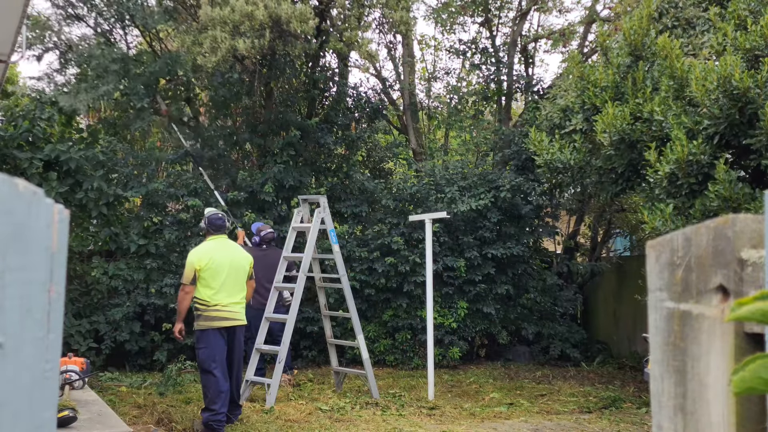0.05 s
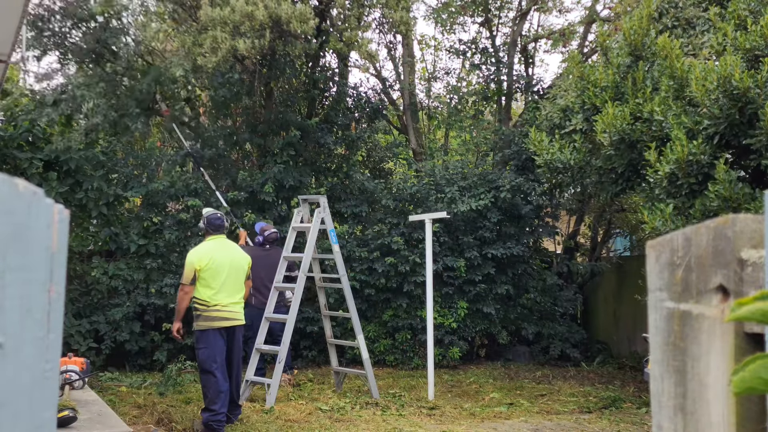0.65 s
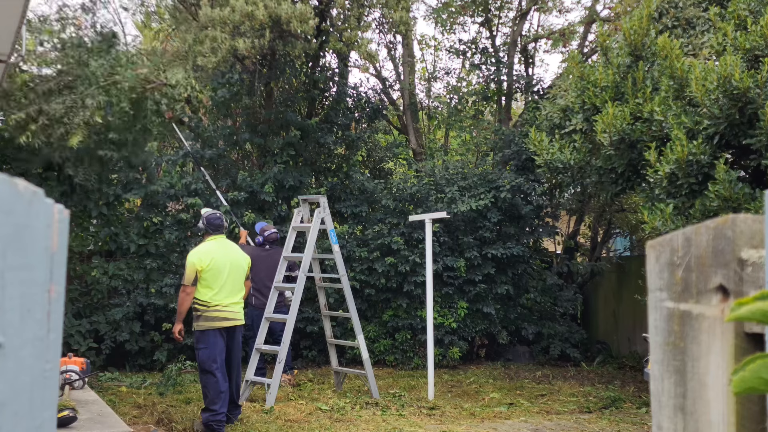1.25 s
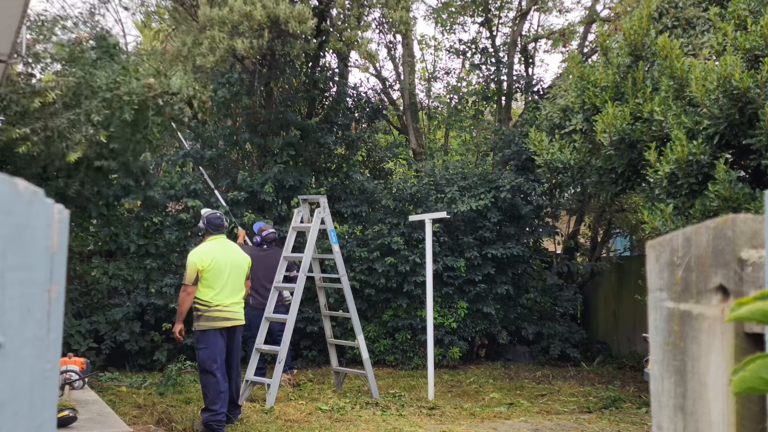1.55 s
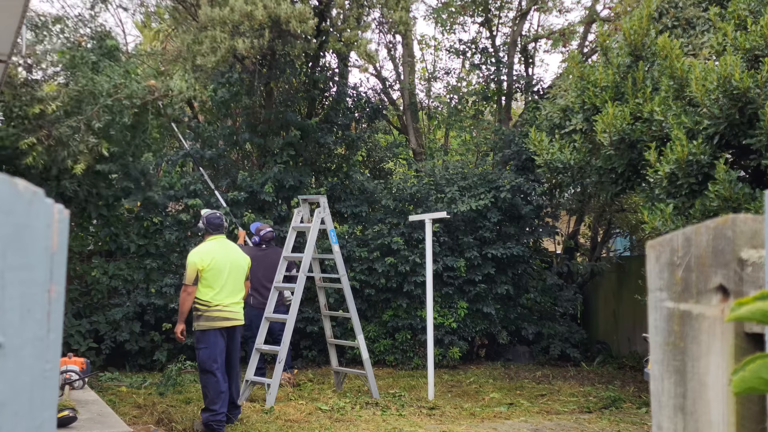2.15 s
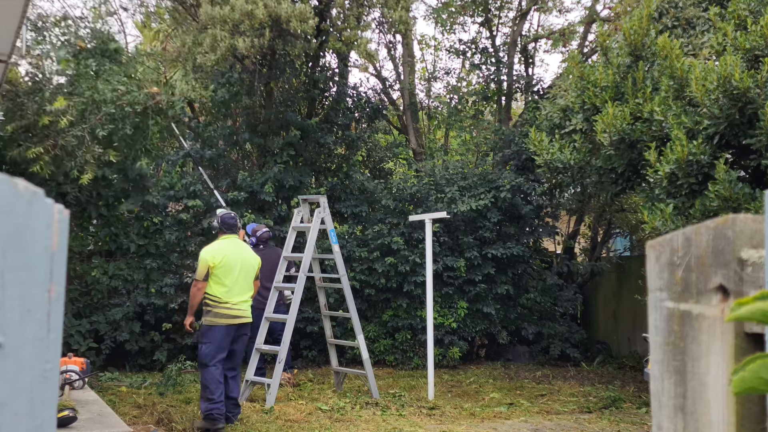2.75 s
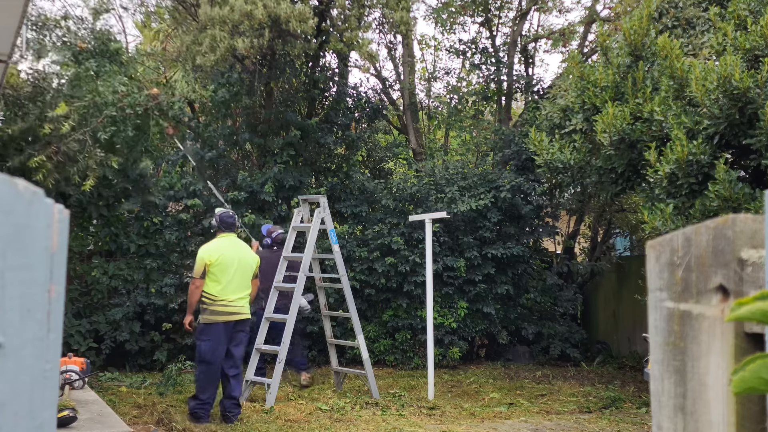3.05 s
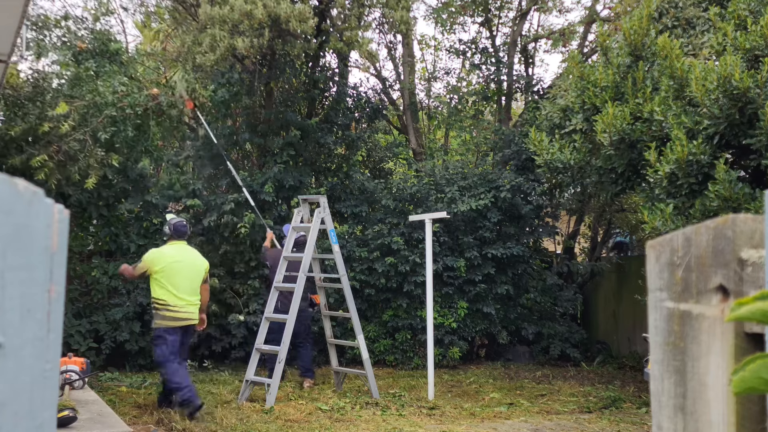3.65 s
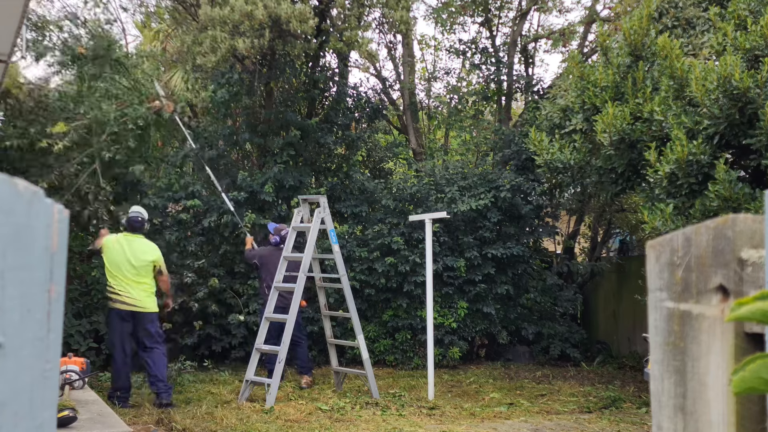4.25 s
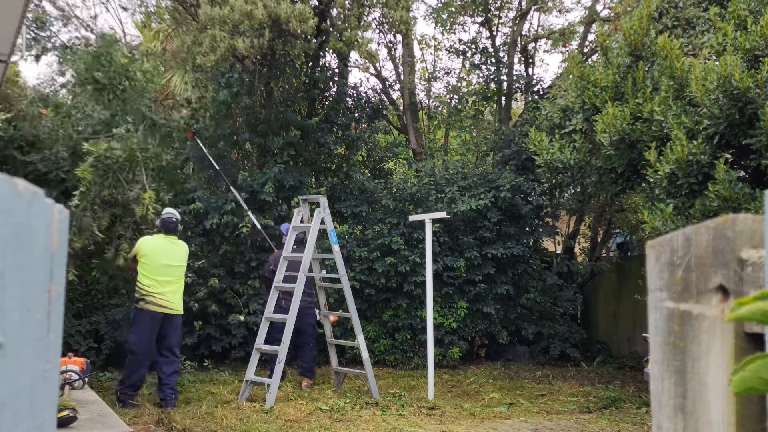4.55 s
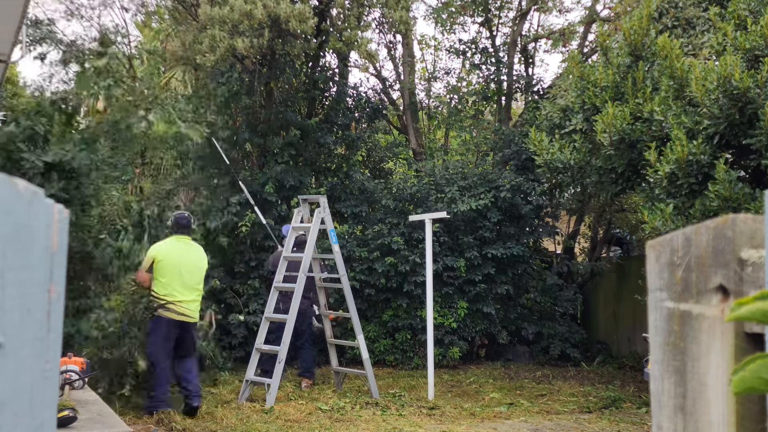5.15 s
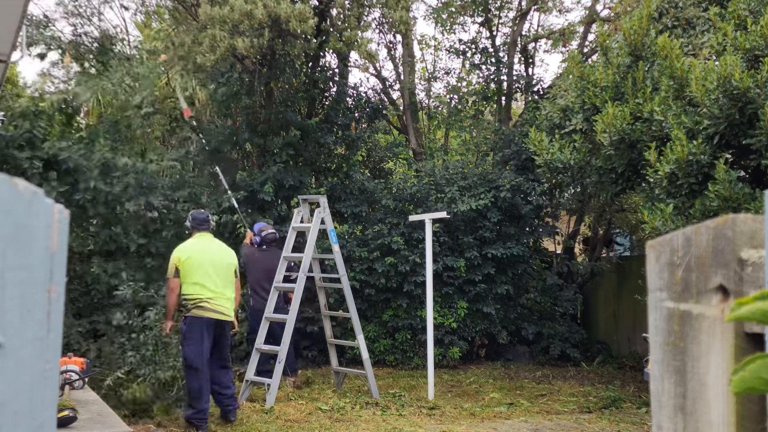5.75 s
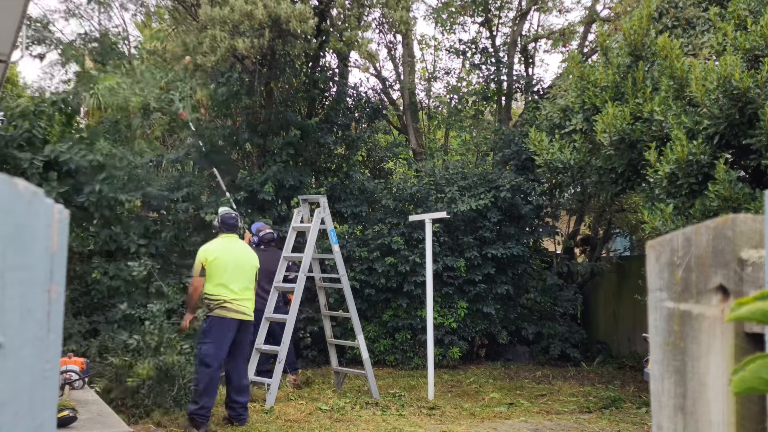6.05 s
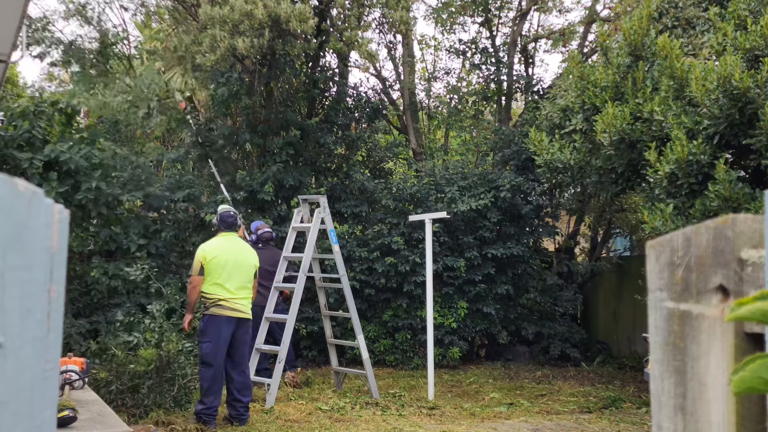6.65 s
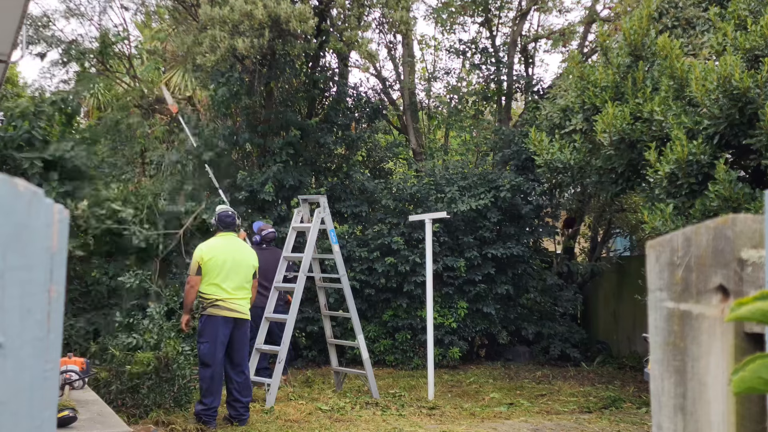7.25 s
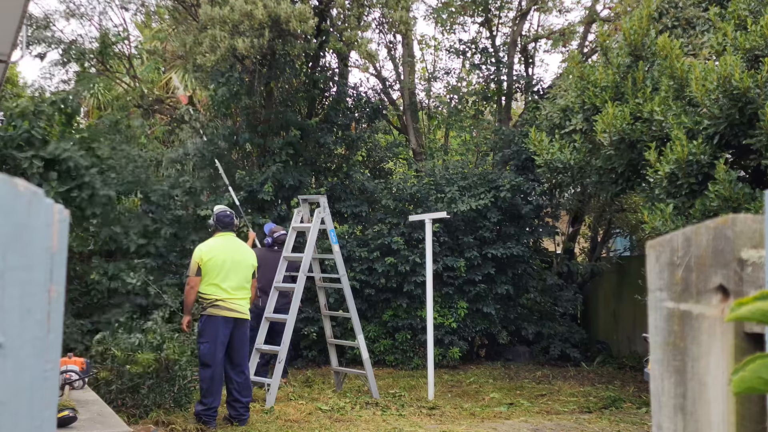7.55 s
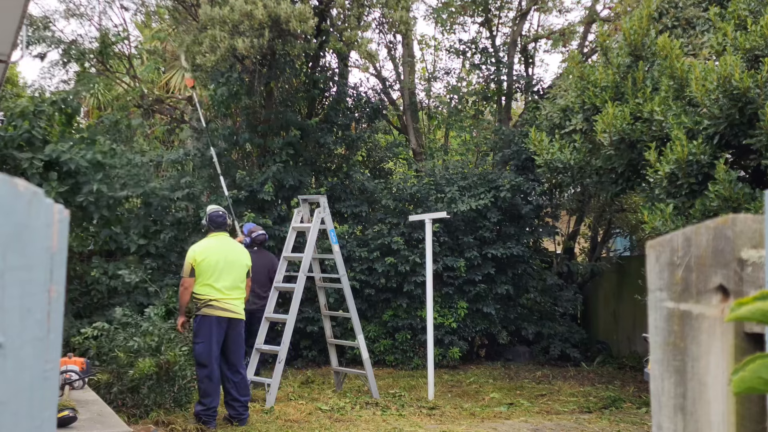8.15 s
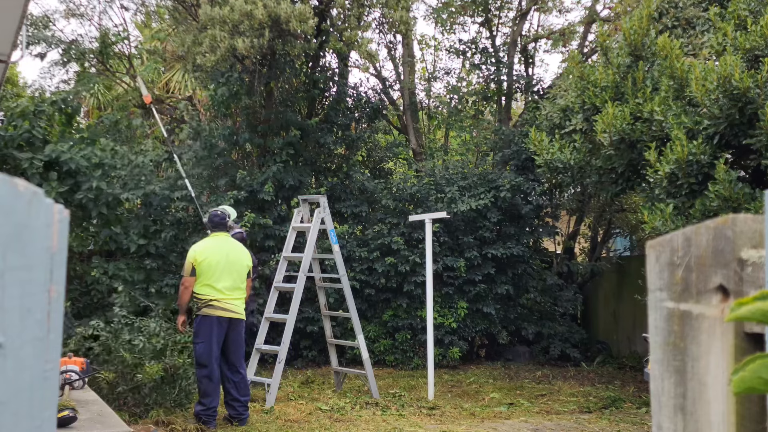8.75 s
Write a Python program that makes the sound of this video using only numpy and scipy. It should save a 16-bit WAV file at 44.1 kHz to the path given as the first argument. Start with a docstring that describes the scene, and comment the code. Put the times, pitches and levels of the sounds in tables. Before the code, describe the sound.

A petrol pole saw is already running flat out, some metres away in a quiet backyard and slightly to the left. Its exhaust booms and snarls under the rasp and thin metallic ring of the chain. The pitch sags as the chain bites at about 0.6 and 1.6 seconds, recovering each time. At 2.9 seconds the throttle shuts and the engine coasts down to a lumpy idle, with uneven pops, clinks and sharp little knocks. Around 5 seconds a cut branch brushes softly through leaves. At 5.7 seconds the engine chugs up again and holds full speed from 6 to 7 seconds. It then winds down and idles with the same ragged popping and clatter until the end at about 9 seconds, with a tiny leaf rustle near 8.6 seconds. A faint outdoor hush lies underneath throughout.

```python
"""Pole saw in a hedged backyard

A four-stroke petrol pole saw, some metres off, runs flat out twice, sagging when the chain bites,
and drops to a lumpy, knocking idle after each run. Exhaust pulses boom, bark and snarl through the
muffler, chain and gears rasp and ring the bar, and a cut branch brushes through the leaves.
Hedge and fence scatter the sound over a faint outdoor hush."""
import sys
import numpy as np
from scipy import signal
from scipy.fft import rfft, irfft, next_fast_len
from scipy.io import wavfile
from scipy.ndimage import uniform_filter1d

SR = 44100
rng = np.random.default_rng(int(sys.argv[2]) if len(sys.argv) > 2 else 0)


def master_out(mix):
    """Clip the mix to full scale and print it as 16-bit PCM to the path in sys.argv[1]."""
    frames = np.transpose(np.atleast_2d(mix))
    ceiling = np.clip(frames, -1, 1)
    pcm = np.round(ceiling * 32767).astype(np.int16)
    wavfile.write(sys.argv[1], SR, pcm)


N = 397341
T = np.arange(N) / SR
FULL_HZ, IDLE_HZ = 80.3, 23.476  # firing rates

# squeezes of the throttle:
# (opens [s], flat out [s], shuts [s], boom [dB], bark [dB], snarl [dB], snarl drift [dB/s])
BURSTS = [(-.3, -.03, 2.896, -49.5, -69.5, -65.5, 0.5), (5.69, 5.973, 7.019, -47.5, -69, -57, -11)]
# heavy exhaust pops that stand out of the idle: (time [s], peak [dB])
HEAVY_POPS = [(3.207, -58), (3.255, -56), (3.364, -51), (3.388, -51), (3.410, -53), (3.481, -54),
              (3.533, -51.5), (3.648, -55), (3.699, -52.5), (3.770, -57), (3.833, -58), (3.889, -57),
              (3.93, -57), (4.045, -55), (4.093, -60), (4.151, -63), (4.247, -60), (4.300, -55),
              (4.357, -55.5), (4.435, -54), (4.489, -62), (4.58, -55), (4.62, -55), (4.705, -60),
              (4.877, -59), (5.101, -60), (5.216, -54), (5.309, -58), (5.444, -56.5), (5.600, -61),
              (7.365, -61), (7.44, -52), (7.484, -55), (7.563, -55), (7.627, -51), (7.695, -58),
              (7.816, -60), (7.904, -54), (8.085, -58), (8.286, -55), (8.473, -56), (8.623, -59),
              (8.693, -58), (8.825, -57)]
# strength of the other idle strokes, one curve for each spell of idling: (time [s], peak [dB])
IDLE_SPELLS = [
    [(3.17, -69), (3.33, -59), (3.43, -54.5), (3.59, -62), (3.72, -60), (4.42, -59.5), (5.02, -63),
     (5.2, -61), (5.72, -56)],
    [(7.28, -80), (7.38, -60.5), (7.87, -56), (8.35, -59), (8.75, -58), (9.0, -59.5)],
]
# muffler resonances heard at low speed: (frequency [Hz], width [Hz], level [dB])
MUFFLER_MODES = [(74, 30, 2.5), (155, 26, -2), (185, 130, -3)]


def firing_rate(pick_up_hz_per_s=280, coast_s=.175):
    """The engine climbs steadily from idle, sags where the chain bites and coasts back down."""
    # engine speed through each cut: (time [s], firing rate [Hz])
    first_cut = [(0.0, 76.65), (0.23, 76.34), (0.44, 72.86), (0.6, 68.1), (0.69, 70.07), (0.8, 76.3),
                 (1.16, 77), (1.32, 77.2), (1.6, 69.2), (1.66, 69.88), (1.77, 71.3), (2.19, 75.22),
                 (2.32, 73.04), (2.42, 76.46), (2.86, 77.22), (2.91, 76.27)]
    second_cut = [(5.96, 71.13), (6.023, 76.65), (6.211, 76.7), (6.45, 79.06), (6.518, 77.47),
                  (6.644, 78.72), (6.8, 76.42), (7.035, 77)]
    hz = np.full(N, IDLE_HZ)
    for cut in (first_cut, second_cut):
        s, cut_hz = np.transpose(cut)
        above_idle = np.interp(T, s, cut_hz) - IDLE_HZ - pick_up_hz_per_s * np.maximum(s[0] - T, 0)
        coasting = np.exp(-np.maximum(T - s[-1], 0) / coast_s)
        hz = np.maximum(hz, IDLE_HZ + above_idle * coasting)
    return hz


def crank(hz):
    """Crankshaft turns, two to a firing; the idle hunts, and every heavy pop falls on a whole turn."""
    hunting = 1 + .00239 * walk(25) + .02 * walk(20) * (hz < 35)
    turns = np.cumsum(2 * hz * hunting) / SR
    pop_s = np.array(HEAVY_POPS)[:, 0]
    slip = np.unwrap(np.interp(pop_s, T, turns) % 1, period=1)
    return turns - np.interp(T, pop_s, slip)


def boom(turns, hz):
    """The muffler booms at shaft and firing rate; both tones slide along its resonances."""
    # flanks of the muffler resonances: (frequency [Hz], gain [dB])
    flanks = [(68, -12), (72, -5.5), (77, -3.5), (136, -2.5), (140, -7.5), (146, -2.5), (152, 1.5),
              (157, 2.7)]
    shaft = undb(curve(2 * hz, flanks)) * np.cos(2 * np.pi * turns)
    firing = undb(curve(hz, flanks)) * np.sin(np.pi * turns + np.pi / 4)
    gain = sum(undb(db) * envelope(start, end, .055, .026) for _, start, end, db, *_ in BURSTS)
    return np.sqrt(2) * (shaft + firing) * gain


def bark(turns, hz, honk_width_hz=38, smear_rad=.547):
    """Stereo overtones of the uneven exhaust pulses; each wavers as its paths round the yard shift."""
    # exhaust tone above the boom, shaped by the muffler: (frequency [Hz], level [dB])
    exhaust_eq = [(205, 8), (218, 9), (228, 5.5), (275, 0), (308, 5), (342, -1.5), (362, 8.5), (385, 4),
                  (410, -6.5), (440, 4), (485, 5.5), (510, -2.5), (540, -2.5), (590, -9.5), (680, 0),
                  (830, -3), (1020, 0), (1220, -4.5), (1310, .5), (1600, -5.5), (1820, -5), (2400, -10)]
    # bands that honk or drop out with the way the outlet faces:
    # (start [s], end [s], centre [Hz], gain [dB])
    honks = [(0, 1.402, 975, 7), (.85, 1.3, 1280, 4.5), (1.5, 1.85, 866, -2), (1.5, 1.898, 986, 8),
             (1.754, 2.099, 710, 4.5), (1.853, 2.1, 810, 6.5), (2.4, 2.901, 770, 4.5), (2.4, 2.9, 1140, 3),
             (2.19, 2.686, 1062, 10), (2.7, 2.9, 1500, 5), (5.95, 6.451, 713, 11.5), (5.95, 6.3, 910, 8.5),
             (5.95, 6.349, 1005, 9), (5.95, 6.195, 1340, 11), (6.35, 6.65, 1190, 9.5),
             (6.45, 7.051, 846, 11.5), (6.55, 7.05, 612, 10.5), (6.706, 7.051, 303.2, 5.5),
             (6.45, 7.05, 954, -14), (.8, 1.3, 870.4, -17), (1.354, 1.753, 732, 5), (1.7, 2.1, 1220, 6),
             (6.0, 6.7, 1545, 7)]
    gain = sum(undb(db) * envelope(start, end, .064, .073) for _, start, end, _, db, *_ in BURSTS)
    on = gain > gain.max() / 1000
    firing_phase = np.pi * turns + .008 * walk(110)
    gain = gain * undb(.9 * walk(90))
    bands = [(at_hz, db * gate(start, end, fade_s=.039)[on]) for start, end, at_hz, db in honks]
    stereo = np.zeros((2, N))
    for k in range(3, 32):
        tone_hz = k * hz[on]
        low_hz, high_hz = tone_hz.min() - 2 * honk_width_hz, tone_hz.max() + 2 * honk_width_hz
        honk_db = sum(db * np.exp(-((tone_hz - at_hz) / honk_width_hz) ** 2)
                      for at_hz, db in bands if low_hz < at_hz < high_hz)
        astray = np.clip((k * FULL_HZ - 200) / 700, 0, 1)  # lows come straight, highs by many paths
        waver_db = astray * (1.8 * walk(7)[on] + 1.2 * walk(25)[on])
        level = undb(curve(tone_hz, exhaust_eq) + honk_db + waver_db)
        lag = smear_rad * (min(k, 9) - 3) ** 2  # the muffler staggers low tones, rounding the pulse
        phase = k * firing_phase[on] - lag + (.3 + .6 * astray) * walk(2)[on]
        side = .48 * astray * np.cos(phase + 2 * walk(1.43)[on])
        stereo[:, on] += level * (np.cos(phase) + np.array([side, -side]))
    return np.sqrt(2) * stereo * gain


def snarl(turns, hz, sag_db_per_hz=-.7):
    """Rough gas tears out with each firing, weaker as the chain drags the speed down."""
    # throaty midrange of the gas: (frequency [Hz], level [dB])
    gas_eq = [(350, -25.5), (600, 2), (800, 4), (1020, 7.5), (1200, -3), (1400, -3), (1900, -14),
              (3000, -18), (6000, -27)]
    firings = strokes(turns, weak_db=-14, scatter_db=2, jitter_s=.0002)
    gas = colour(unit(hiss() * tail(firings, decay_s=.003)), gas_eq)
    gain = 0
    for _, start, end, _, _, db, drift in BURSTS:
        held_s = np.clip(T, start, end)
        sag_db = sag_db_per_hz * (FULL_HZ - np.interp(held_s, T, hz))
        gain += undb(db + drift * (held_s - start) + sag_db) * envelope(start, end, .15, .024)
    return gas * gain


def spit(turns, trim_db=-6.5):
    """Gas spits from the outlet with every firing, scaled to each burst's snarl setting."""
    # low body and bright edge of the spit: (frequency [Hz], level [dB])
    spit_eq = [(500, 9), (1400, -18), (3000, -14), (6500, 4), (9500, -6.5), (15000, -7)]
    puffs = hiss() * tail(strokes(turns, weak_db=-9, scatter_db=2.5, jitter_s=.0001), decay_s=.006)
    gain = sum(undb(snarl_db + trim_db) * envelope(opens + .093, shuts, .086, .091)
               for opens, _, shuts, _, _, snarl_db, _ in BURSTS)
    return colour(unit(puffs), spit_eq) * gain


def chain(turns, hz, rasp_db=-54, ring_db=-59, grip_s=.25):
    """While the clutch grips, links and gears rasp; the bar rings more freely at full speed."""
    # broad rasp of chain and gears: (frequency [Hz], level [dB])
    rasp_eq = [(30, -8.5), (200, -2), (600, -7), (1100, -1.8), (1500, -.5), (2400, -1.3), (2900, -.5),
               (3500, -2.7), (4400, -4.5), (6300, -5.7), (7600, -4.2), (9200, -15.2), (12000, -15.7),
               (15500, -16.2)]
    surge = 1 + .023 * np.cos(np.pi * turns - 1) + .0062 * np.cos(2 * np.pi * turns - 1)
    grains = unit(hiss() * surge * undb(1.25 * walk(440) + .88 * walk(30) + .69 * walk(6)))
    rasp = undb(rasp_db) * colour(grains, rasp_eq)
    damping_db = .57 * np.clip(FULL_HZ - hz, 0, 10)
    ringing = undb(ring_db - damping_db) * metal(hiss() * surge)
    clutch = sum(envelope(opens + grip_s, shuts, grip_s, .13) for opens, _, shuts, *_ in BURSTS)
    return (rasp + ringing) * clutch


def metal(x):
    """The metal parts ring; which one speaks changes as the chain shifts on the bar."""
    # modes of guide bar, clutch drum and pole: (frequency [Hz], base width [Hz], level [dB])
    modes = [(2665, 50, -1), (2926, 40, 5.5), (4160, 130, 1), (4340, 90, 1), (4720, 220, -3),
             (5340, 160, -4.5), (7410, 85, -1)]
    return unit(sum(undb(db + 2.5 * walk(22) + 2 * walk(3)) * ring(ring(x, hz, 1.5 * width), hz, 4 * width)
                    for hz, width, db in modes))


def gulps(turns, level_db=-54.5):
    """As the throttle opens, the first full charges thud in the muffler's lowest resonance."""
    hz, width, _ = MUFFLER_MODES[0]
    firings = strokes(turns, weak_db=-15, scatter_db=4, jitter_s=.00082)
    thuds = ring(ring(firings, hz, width), hz, width)
    gain = sum(envelope(opens + .15, opens + .16, .15, .032) for opens, *_ in BURSTS)
    return undb(level_db) * even_out(thuds, SR // 7) * gain


def sputter(turns, level_db=-54):
    """Picking up and running down, the engine chugs raggedly into the muffler."""
    puffs = muffler(strokes(turns, weak_db=-3, scatter_db=1.5, jitter_s=.0009))
    gain = 0
    for opens, start, shuts, *_ in BURSTS:
        above_idle = envelope(start, shuts + .12, start - opens, .086)
        flat_out = envelope(start, shuts, .043, .099)
        gain += above_idle * (1 - flat_out)
    return undb(level_db) * even_out(puffs, SR // 16) * gain


def strokes(turns, weak_db, scatter_db, jitter_s, count=1100):
    """A pulse a turn, strong exhaust then weak intake, each a little off in size and time."""
    index = np.arange(count)
    size, lag = rng.standard_normal((count, 2)).T
    sizes = undb(weak_db * (index % 2) + scatter_db * size) * (index > turns[0]) * (index < turns[-1])
    return pulses(np.interp(index, turns, T) + jitter_s * lag, sizes)


def muffler(beats, top_hz=265):
    """Each pulse leaves the muffler as a round pop that peaks at the pulse's time and height."""
    kick = signal.unit_impulse(SR // 8)
    modes = sum(undb(db) * ring(kick, hz, width) for hz, width, db in MUFFLER_MODES)
    pop = signal.sosfilt(signal.butter(4, top_hz, fs=SR, output="sos"), modes)
    pop = ring(pop, hz=150, width_hz=240)  # the chamber softens the onset
    height = np.abs(signal.hilbert(pop))
    return signal.oaconvolve(beats, -pop / height.max())[height.argmax():][:N]


def idle(turns, lead_s=.002, loose_db=-77, clink_db=-4):
    """Uneven pops leave the muffler; valves and slack chain clatter with each, in step with its force."""
    # clatter of valves and chain: (frequency [Hz], level [dB])
    clatter_eq = [(200, -25.5), (400, 2.5), (700, 3.5), (1100, -4), (1450, 2), (2000, -2), (2700, -3),
                  (3400, -5), (4700, -8.5), (6200, -4.5), (7500, -6.5), (9200, -16.5), (15000, -23.5)]
    # clatter against the strokes, one value a spell: (level [dB])
    clatter_levels = [-13.5, -14.5]
    s, size = idle_strokes(turns)
    beats, shaking = 0, 0
    for spell, clatter_db in zip(IDLE_SPELLS, clatter_levels):
        start, end = spell[0][0], min(spell[-1][0], T[-1])
        sizes = size * (s > start) * (s < end)
        beats += pulses(s, sizes)
        ticks = uniform_filter1d(tail(pulses(s - lead_s, sizes), decay_s=.011), SR // 250)
        loose = undb(loose_db) * envelope(start, end, .1, .05)
        shaking += undb(clatter_db) * (ticks + loose)
    rattle = colour(hiss(), clatter_eq) + undb(clink_db) * clinks(s - 2 * lead_s)
    return muffler(beats) + rattle * shaking


def idle_strokes(turns, scatter_db=1.2, count=1100):
    """Time and strength of each idle turn: exhaust and intake alternate from the last heavy pop."""
    # intake against exhaust strokes, fading as the idle settles: (time [s], level [dB])
    intake = [(4.45, 2.5), (4.7, -5.5), (5.3, -3), (5.45, 1), (7.88, 0), (8.0, -4.5), (8.55, -10),
              (8.7, -18)]
    index = np.arange(count)
    s = np.interp(index, turns, T)
    pop_s, pop_db = np.transpose(HEAVY_POPS)
    pop_turn = np.round(np.interp(pop_s, T, turns)).astype(int)
    last_pop = pop_turn[np.maximum(np.searchsorted(pop_turn, index, "right") - 1, 0)]
    is_intake = (index - last_pop) % 2
    db = curve(s, np.vstack(IDLE_SPELLS)) + is_intake * curve(s, intake)
    db += scatter_db * rng.standard_normal(count)
    db[pop_turn] = pop_db
    return s, undb(db)


def clinks(stroke_s, centre_hz=4100, width_hz=600, scatter_oct=.3, scatter_db=3):
    """Another link of the slack chain rings at every stroke, with its own pitch and strength."""
    links = np.clip(rng.standard_normal((len(stroke_s) + 1, 2)), -2, 2)
    pitch, size = links[np.searchsorted(stroke_s, T)].T
    shimmer = unit(signal.sosfilt(signal.butter(2, width_hz / 2, fs=SR, output="sos"), hiss()))
    tone = np.sqrt(2) * np.cos(2 * np.pi * np.cumsum(centre_hz * 2 ** (scatter_oct * pitch)) / SR)
    return shimmer * tone * undb(scatter_db * size)


def knocks(crack_trim_db=1, ring_decay_s=.019):
    """A hard idle stroke cracks in the housing and rings the pole briefly."""
    # strokes that knock the drive shaft: (time [s], crack [dB], ring [dB], ring pitch [Hz])
    hits = [(3.2048, -69, -64, 4420), (3.243, -74, -70, 4210), (3.362, -67, -62, 3950),
            (3.3867, -66, -68, 3620), (3.408, -62, -65, 3650), (3.430, -64, -68, 5000),
            (3.478, -69, -59, 4930), (3.533, -69, -67, 4930), (3.6463, -67, -70, 4560),
            (3.6726, -68, -62, 4670), (3.697, -66, -54.5, 4780), (3.828, -65, -70, 4130),
            (3.887, -71, -60, 4400), (3.9291, -73, -65.5, 4350), (3.963, -65, -56.5, 4075),
            (4.082, -66, -62, 4260), (4.2459, -72, -64, 4390), (4.2992, -71, -63, 4640),
            (4.383, -66, -56, 5660), (4.4223, -65, -66, 4540), (4.5736, -68, -64, 4430),
            (5.216, -62, -59, 4650), (5.4888, -68, -58, 4640), (5.5983, -63, -62, 4680),
            (5.6386, -74, -58, 4680), (7.4393, -65, -69, 4500), (7.626, -70, -64, 5170),
            (7.9445, -69, -61, 4960), (8.08, -68, -63, 5200), (8.415, -68, -65, 5500),
            (8.82, -69, -66, 4570)]
    # crack of the housing: (frequency [Hz], level [dB])
    crack_eq = [(200, -15), (600, 7), (1300, -9), (2600, 3), (3400, -7), (4800, -4), (6200, -8), (7500, -2),
                (9200, -18), (15000, -23)]
    s, crack_db, _, _ = np.transpose(hits)
    snaps = tail(pulses(s, undb(crack_db + crack_trim_db)), decay_s=.007)
    out = colour(hiss() * uniform_filter1d(snaps, SR // 400), crack_eq)
    t = T[:SR // 10]
    for start, _, db, hz in hits:
        tone = ring(rng.standard_normal((3, len(t))) * np.exp(-t / ring_decay_s), hz, width_hz=260)
        i = int(start * SR)
        out[:, i:i + len(t)] += (undb(db) * tone / np.abs(tone).max())[:, :N - i]
    return out


def hum(hz=150.6):
    """A soft wavering tone carries on between the idle strokes."""
    # swell of the hum: (time [s], level [dB])
    levels = [(3.2, -74), (4.2, -70.5), (4.9, -76.5), (5.3, -74), (5.6, -65), (7.3, -69), (8.15, -67.5),
              (8.6, -73.5), (9.0, -68)]
    tone = np.sqrt(2) * np.sin(2 * np.pi * np.cumsum(hz + 4 * walk(9)) / SR)
    idling = sum(envelope(spell[0][0] + .1, spell[-1][0], .1, .05) for spell in IDLE_SPELLS)
    return tone * idling * swell(levels)


def foliage():
    """Leaves and twigs brush past each other in countless small ticks."""
    # foliage dragged through the hedge: (start [s], end [s], attack [s], level [dB])
    drags = [(4.815, 5.21, 0.38, -66.5), (8.59, 8.613, 0.039, -76)]
    # rustle of the leaves: (frequency [Hz], level [dB])
    rustle_eq = [(200, 11.5), (500, -3.5), (1500, -5.5), (3000, -3.5), (7500, -1), (9200, -11),
                 (15500, -14.5)]
    grains = hiss() * undb(3 * np.minimum(rng.exponential(size=N), 3.5) + 1.2 * walk(70))
    gain = sum(undb(db) * envelope(start, end, attack, .52 * attack) for start, end, attack, db in drags)
    return colour(unit(grains), rustle_eq) * gain


def ambience(hush_db=-72.5):
    """Faint outdoor hush with a narrow whirr in it."""
    # bed of the yard: (frequency [Hz], level [dB])
    hush_eq = [(25, -9), (70, 13.5), (160, -5), (330, -1.5), (600, -7.5), (1000, -4.5), (1800, -12),
               (3500, -10.5), (7500, -17.5), (9500, -24), (15000, -38.5)]
    # swell of the whirr behind the saw: (time [s], level [dB])
    whirr_levels = [(0, -80), (4.0, -80.5), (5.6, -75), (7.4, -77.5), (9.0, -85)]
    hush = colour(hiss(), hush_eq) * undb(hush_db + walk(3))
    whirr = ring(ring(hiss(), hz=1460, width_hz=180), hz=1400, width_hz=350)
    return hush + unit(whirr) * swell(whirr_levels) * undb(1.2 * walk(9))


def backyard(paths, lead_s=.00005, left_db=1.8):
    """Direct sound slightly from the left, blended band by band with scatter off hedge and fence."""
    # scattered against direct sound: (frequency [Hz], level [dB])
    scatter = [(60, -44), (160, 17.5), (300, -34.5), (600, 0), (1200, -2.5), (2500, 14), (8000, 6.5)]
    size = next_fast_len(N + 512, True) // 2 * 2
    hz = np.arange(size // 2 + 1) * SR / size
    spectra = rfft(paths, size)
    share = spectrum(scatter, size)
    direct = spectra[0] * np.exp(-2j * np.pi * hz * np.array([[0], [lead_s]]))
    balance = undb(np.array([[.5], [-.5]]) * left_db * hz / (hz + 700))
    return irfft(balance * (direct + share * spectra[1:]) / np.hypot(1, share), size)[:, :N]


def undb(db):
    """Decibels to gain."""
    return 10 ** (np.asarray(db) / 20)


def unit(x):
    """Scale to rms 1."""
    return x / np.sqrt(np.mean(x ** 2))


def even_out(x, window):
    """Hold the rms near 1 over a sliding window of samples."""
    return x / np.sqrt(uniform_filter1d(x ** 2, window) + 1e-12)


def curve(x, points):
    """Read a breakpoint curve at x."""
    return np.interp(x, *np.transpose(points))


def envelope(start, end, attack_s, release_s):
    """Rise to 1 by the start, hold to the end, then die away exponentially."""
    return np.clip(1 + (T - start) / attack_s, 0, 1) * np.exp(-np.maximum(T - end, 0) / release_s)


def gate(start, end, fade_s):
    """Open from start to end, with a bell-shaped fade on either side."""
    outside = np.maximum(start - T, 0) + np.maximum(T - end, 0)
    return np.exp(-(outside / fade_s) ** 2)


def swell(points):
    """Gain from (time [s], level [dB]) points, dying away outside their span."""
    return undb(curve(T, points)) * gate(points[0][0], points[-1][0], fade_s=.1)


def hiss():
    """Unrelated noise for three paths: direct, scattered left, scattered right."""
    return rng.standard_normal((3, N))


def walk(rate):
    """Random drift with a spread near 1 and `rate` new values a second."""
    knots = rng.standard_normal(4096)
    return 1.2 * np.interp(T * rate, np.arange(len(knots)), knots)


def pulses(times, sizes):
    """Impulses, each shared between two samples."""
    at = np.clip(np.asarray(times) * SR, 0, N - 2)
    whole = at.astype(int)
    late = at - whole
    return np.bincount(whole, sizes * (1 - late), N) + np.bincount(whole + 1, sizes * late, N)


def tail(x, decay_s):
    """Give every impulse an exponential tail."""
    return signal.lfilter([1], [1, -np.exp(-1 / (decay_s * SR))], x)


def ring(x, hz, width_hz):
    """One resonance, gain 1 at the centre."""
    return signal.lfilter(*signal.iirpeak(hz, hz / width_hz, SR), x)


def spectrum(points, size):
    """Gain of (frequency [Hz], level [dB]) points on the bins of a transform."""
    hz, db = np.transpose(points)
    return undb(np.interp(np.log(np.arange(size // 2 + 1) * SR / size + 1), np.log(hz), db))


def colour(x, points, size=4096):
    """Minimum-phase EQ of unit energy with the given spectrum."""
    cepstrum = irfft(np.log(spectrum(points, size)))
    cepstrum[1:size // 2] *= 2
    cepstrum[size // 2 + 1:] = 0
    response = irfft(np.exp(rfft(cepstrum)))
    return signal.oaconvolve(np.atleast_2d(x), response[None] / np.linalg.norm(response), axes=1)[:, :N]


def scene():
    """One crankshaft paces exhaust, chain and idle; leaves and hush sit behind the saw."""
    hz = firing_rate()
    turns = crank(hz)
    revving = boom(turns, hz) + snarl(turns, hz) + spit(turns) + chain(turns, hz)
    chugging = gulps(turns) + sputter(turns)
    idling = idle(turns) + hum() + knocks()
    return bark(turns, hz) + backyard(revving + chugging + idling + foliage() + ambience())


def record(dry, top_hz=15800):
    """A steep low-pass takes off the highest treble."""
    return signal.sosfilt(signal.ellip(10, .1, 70, top_hz, fs=SR, output="sos"), dry)


dry = scene()
out = record(dry)
master_out(out)
```